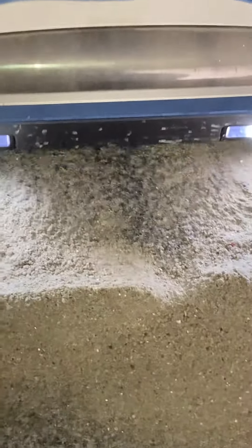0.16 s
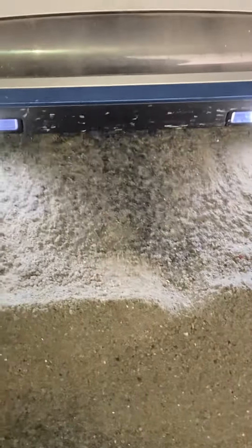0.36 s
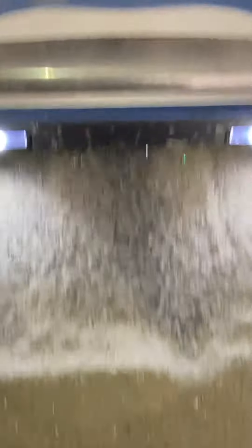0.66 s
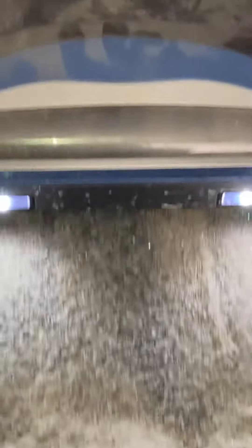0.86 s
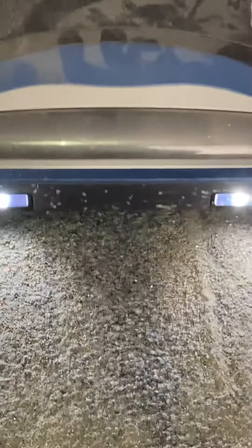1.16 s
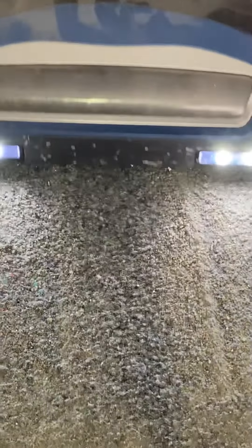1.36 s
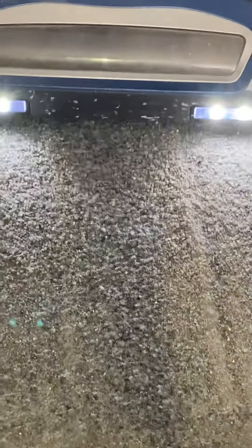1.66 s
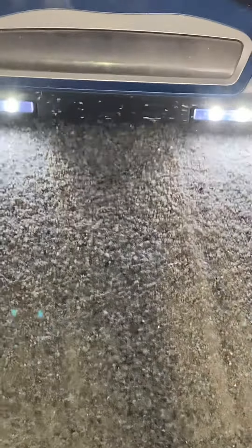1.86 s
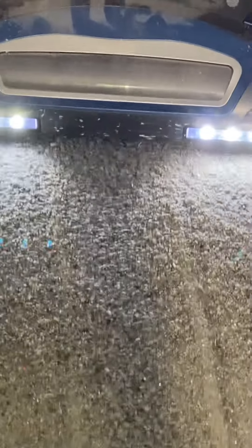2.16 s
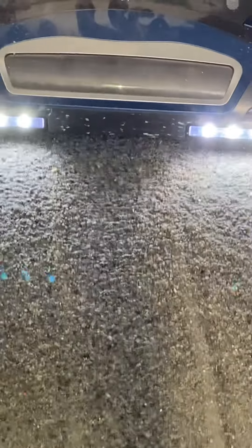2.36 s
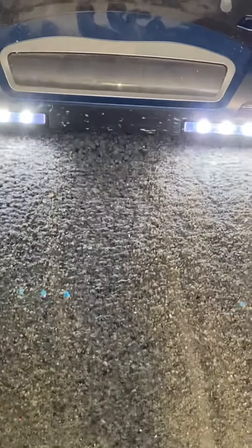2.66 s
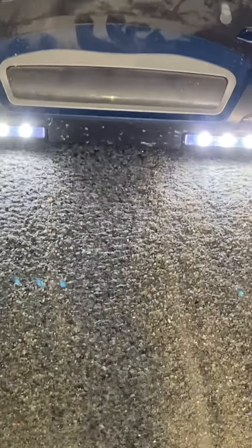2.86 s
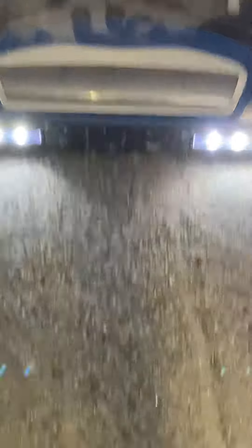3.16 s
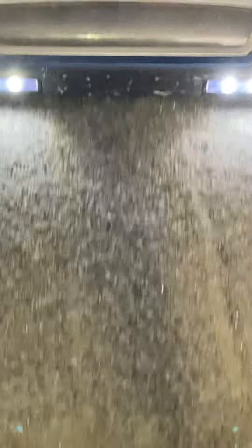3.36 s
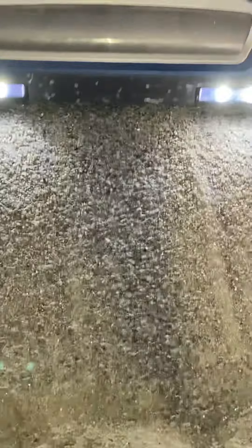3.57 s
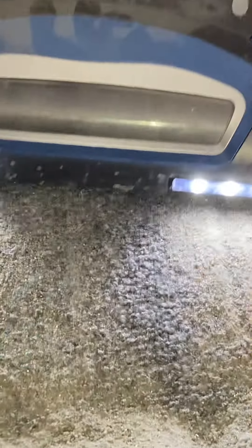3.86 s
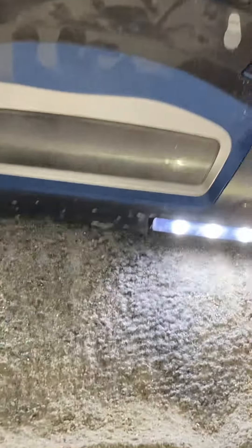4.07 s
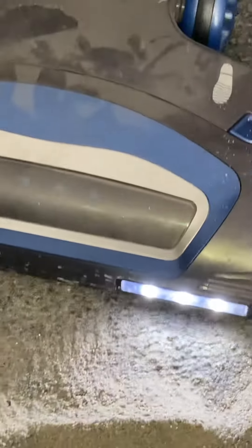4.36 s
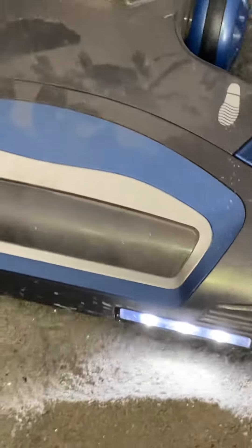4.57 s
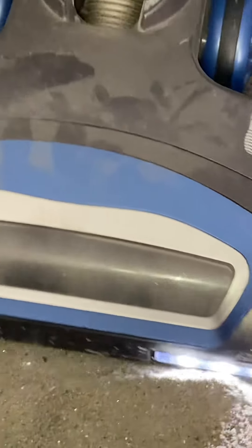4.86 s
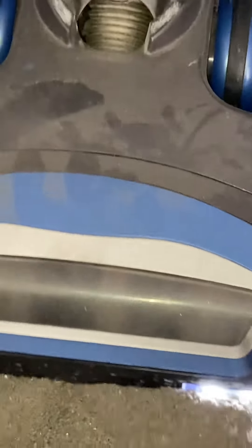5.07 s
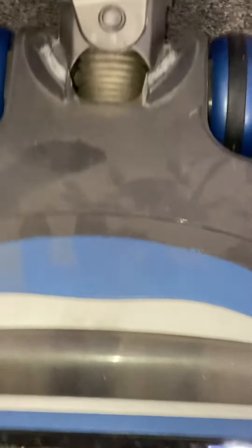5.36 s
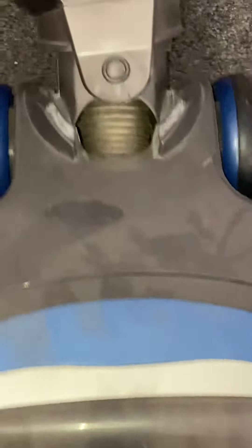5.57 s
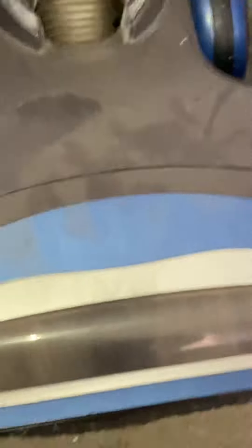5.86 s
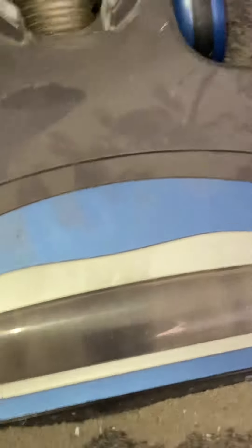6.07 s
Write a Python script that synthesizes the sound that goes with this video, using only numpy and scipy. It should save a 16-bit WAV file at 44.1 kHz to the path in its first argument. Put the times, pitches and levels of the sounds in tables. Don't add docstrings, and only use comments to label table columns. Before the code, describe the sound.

An upright vacuum cleaner runs steadily on carpet, hissing and roaring with a thin motor whine, grit ticks and a low brush drumming.

```python
import sys
import numpy as np
from scipy import signal
from scipy.fft import rfft, irfft, next_fast_len
from scipy.io import wavfile
from scipy.ndimage import uniform_filter1d

SR = 44100
rng = np.random.default_rng(int(sys.argv[2]) if len(sys.argv) > 2 else 0)


def convert_level_to_amplitude(level_db):
    exponent = np.asarray(level_db, float) / 20
    return 10 ** exponent


def dump_mix(stems):
    frames = np.atleast_2d(stems).T
    limited = np.clip(frames, -1, 1)
    pcm = np.round(limited * 32767).astype(np.int16)
    wavfile.write(sys.argv[1], SR, pcm)


N = 273420


def table(rows):
    s, *columns = np.transpose(rows)
    return [np.interp(np.arange(N) / SR, s, column) for column in columns]


def along(rows, hz, axis):
    rows = np.array(rows, float)
    return np.interp(np.log(hz + 1), np.log(rows[:, 0]), rows[:, axis])


def walk(rate):
    hold = int(SR / rate)
    steps = np.repeat(rng.standard_normal(N // hold + 1), hold)
    return 1.156 * uniform_filter1d(uniform_filter1d(steps, hold), hold)[:N]


def swells(rows, rest_db):
    t, total = np.arange(N) / SR, convert_level_to_amplitude(rest_db)
    for peak, rise, fall, db in rows:
        width = np.where(t < peak, rise, fall)
        total = total + convert_level_to_amplitude(db) * np.exp(-((t - peak) / width) ** 2)
    return 20 * np.log10(total)


def rush(colour, level_db, swell_db, flicker_db):
    size = next_fast_len(N)
    hz = np.fft.rfftfreq(size, 1 / SR)
    inside = (hz > colour[0][0]) & (hz < colour[-1][0])
    flow = rfft(rng.standard_normal((2, size))) * convert_level_to_amplitude(along(colour, hz, axis=1)) * inside
    place = 2 * np.log2((hz + 1) / colour[0][0])
    out, swell = 0, walk(9)
    for band in range(int(place[inside].max()) + 2):
        part = irfft(flow * np.clip(1 - abs(place - band), 0, 1), size)[:, :N]
        out = out + part * convert_level_to_amplitude(swell_db * swell + flicker_db * walk(14))
    return out / out.std() * convert_level_to_amplitude(level_db)


def tone(turns, level_db, wobble_db):
    return np.sqrt(2) * convert_level_to_amplitude(level_db + wobble_db * walk(10)) * np.sin(2 * np.pi * turns)


def ring(hits, hz, t60):
    pole = np.exp(2j * np.pi * hz / SR - np.log(1000) / (t60 * SR))
    return signal.lfilter([1], [1, -pole], hits).imag


# time in seconds, nozzle distance in metres, share of the housing under the phone 0-1.
HEAD = [(0.0, 0.39, 0.17), (.74, 0.29, 0.12), (1.24, .31, 0), (1.75, 0.43, 0), (2.23, 0.55, 0.06),
        (2.73, 0.76, 0.11), (3.2, 0.73, 0.35), (3.47, 0.58, .3), (3.75, .4, .35), (4.1, 0.42, 0.52),
        (4.7, .36, 0.59), (5.2, 0.38, 0.57), (5.7, 0.42, 0.9), (6.2, 0.4, 1)]


def head():
    metres, under = table(HEAD)
    return 20 * np.log10(metres / .3), under


def air_db(near_db, share, under_db):
    loss_db, under = head()
    return near_db - share * loss_db + under_db * under


# frequency in Hz, spectrum level in dB per Hz.
HISS = [(1800, -25), (2800, -4), (4000, -4), (5200, -5), (6000, -4), (6600, -2.3), (7800, -3), (8300, -.5),
        (8800, 0), (10500, -1), (12000, -.5), (13300, -2.5), (14000, -5), (15800, -7.5)]


def nozzle_hiss(seal):
    return rush(HISS, air_db(-22.78, share=.98, under_db=.1), swell_db=0, flicker_db=1.08) * seal


# frequency in Hz, spectrum level in dB per Hz.
ROAR = [(650, -11), (850, -7.5), (950, 0), (1050, -2), (1270, 2.5), (1500, -2), (1650, 0), (1800, -1),
        (2000, -21)]


def housing_roar(seal):
    return rush(ROAR, air_db(-34, share=.7, under_db=5.44), swell_db=.48, flicker_db=.5) * seal


# frequency in Hz, spectrum level in dB per Hz.
COVER = [(1650, -24), (1850, 2.5), (2000, 2.5), (2150, 1), (2450, 4), (2700, -4), (3100, -48)]


def cover_rush(seal):
    return rush(COVER, air_db(-33, share=1, under_db=-1.5), swell_db=.06, flicker_db=1.1) * seal


# frequency in Hz, spectrum level in dB per Hz.
DUCT = [(330, -41), (400, -14), (470, -11), (560, -3), (700, 1), (800, 1.5), (950, -4.5)]


def duct_rush():
    return rush(DUCT, air_db(-39.06, share=.19, under_db=5), swell_db=.3, flicker_db=.94)


# frequency in Hz, spectrum level in dB per Hz.
RUMBLE = [(25, -26), (45, -19), (80, -14), (125, -4), (170, -2), (210, 0), (270, -7), (305, -5),
          (335, -5.5), (380, -11.5), (450, -23)]


def carpet_rumble():
    return rush(RUMBLE, air_db(-38.8, share=.32, under_db=4.4), swell_db=.6, flicker_db=1.2)


# frequency in Hz, spectrum level in dB per Hz.
THROAT = [(330, -30), (380, -3), (450, 0), (540, -1), (620, -25)]


def throat_rush():
    return rush(THROAT, air_db(-47, share=.8, under_db=5), swell_db=.4, flicker_db=1.1)


# time in seconds, shaft speed in Hz.
MOTOR = [(0.0, 772.0), (1.7, 782.0), (5.0, 790.7), (6.2, 796.4)]
# peak, rise and fall in seconds, peak level in dB.
SHAFT = [
    (.1, .5, .4, -42),
    (1.0, 0.68, 0.23, -33.5),
    (1.55, 0.38, 0.18, -46),
    (3.45, 0.35, 0.24, -41.5),
    (4.12, 0.17, .1, -50),
    (4.85, .2, 0.51, -38),
    (6.1, .35, 0.44, -35),
]
# peak, rise and fall in seconds, peak level in dB.
BLADE = [
    (2.1, .4, .2, -51),
    (2.75, .35, .25, -48),
    (3.5, .35, 0.28, -47),
    (5.35, .2, .3, -46),
    (6.1, .4, .5, -48),
]


def motor():
    hz, shaft_db, blade_db = table(MOTOR)[0], swells(SHAFT, -46), swells(BLADE, -57)
    turns = np.cumsum(hz * (1 + 0.00052 * walk(6.02))) / SR
    unsteady_db = np.clip(-.3 * (shaft_db + 34.5), .6, 5)
    shaft = tone(turns, shaft_db - .4, unsteady_db) + tone(2 * turns, -55, wobble_db=3.5)
    return shaft + tone(7 * turns, blade_db - .1, wobble_db=4)


# time in seconds, turns in Hz.
ROLL = [(0.0, 57.27), (1.25, 57.4), (1.55, 54.46), (2.0, 54.4), (2.6, 52), (3.2, 53.6), (3.85, 52.9),
        (4.4, 49.78), (5.1, 52.24), (5.5, 52), (5.8, 50.5), (6.2, 50.2)]


def roll():
    return np.cumsum(table(ROLL)[0] * (1 + 0.00622 * walk(12))) / SR


# peak, rise and fall in seconds, peak level in dB.
ONCE = [
    (.5, 0.8, .7, -49),
    (1.62, 0.26, .2, -35),
    (2.0, 0.19, 0.46, -37),
    (2.8, 0.35, .3, -47),
    (3.25, 0.23, .15, -38),
    (3.65, 0.24, 0.23, -30.5),
    (4.4, .4, .35, -47),
    (5.3, .22, 0.3, -50),
    (6.0, .2, .3, -49),
]
# peak, rise and fall in seconds, peak level in dB.
ROWS = [
    (2.1, .1, 0.14, -42),
    (2.45, .12, 0.11, -40.5),
    (2.78, .1, 0.16, -46),
    (3.2, .12, 0.14, -42),
    (3.85, .1, 0.36, -26),
    (4.65, 0.28, 0.21, -38),
    (5.15, 0.13, 0.13, -40),
    (5.45, .12, .1, -43),
    (6.1, 0.31, .3, -40.5),
]
# peak, rise and fall in seconds, peak level in dB.
SIXTH = [
    (2.3, 0.22, 0.15, -45.5),
    (3.0, 0.32, .15, -45.5),
    (3.75, 0.23, 0.19, -42),
    (4.55, 0.33, .35, -43.5),
    (5.55, 0.27, 0.13, -36),
    (6.05, 0.21, .3, -37.5),
]
# time in seconds, level in dB.
DRONE = [(0, -47.5), (1.2, -51), (1.5, -59), (6.2, -67)]


def brush(turns):
    once_db, rows_db, sixth_db = swells(ONCE, -60), swells(ROWS, -54), swells(SIXTH, -53.5)
    hum = tone(turns, once_db - .5, wobble_db=.1) + tone(2 * turns, rows_db - 2, wobble_db=3)
    beat = tone(6 * turns, sixth_db - 2.5, wobble_db=2) + tone(5 * turns, -54, wobble_db=6.5)
    beat = beat + tone(4 * turns, .4 * sixth_db - 33, wobble_db=2.5)
    drone_hz = 101.6
    return hum + beat + tone(drone_hz * np.arange(N) / SR, table(DRONE)[0], wobble_db=1)


# time in seconds, peak in dB, low knock against the peak in dB.
GRIT = [(.406, -21, -12), (.894, -21, -12), (1.545, -22, -12), (2.084, -25, -12), (3.457, -23, -10),
        (3.730, -18, -10), (4.341, -23, -6), (4.749, -19, -12), (5.170, -17, -10), (5.696, -21, -4),
        (5.991, -17.5, 0)]
# delay in seconds, its spread in seconds, level in dB.
BOUNCES = [
    (.0008, 0, -1),
    (.002, .0006, -1),
    (.0045, .002, -6),
    (.008, .003, -8),
]
# frequency in Hz, level in dB, t60 in seconds.
DUCT_MODES = [
    (2520, 0, .016),
    (1900, -3, .01),
    (1350, -4, .01),
]


def grit():
    sharp, knock = np.zeros(N), np.zeros(N)
    for (s, db, low_db), bounce in zip(GRIT, rng.random(len(GRIT))):
        for delay, spread, loss_db in BOUNCES:
            at = int((s + delay + spread * bounce) * SR)
            sharp[at] = convert_level_to_amplitude(db + loss_db)
            knock[at] = convert_level_to_amplitude(db + low_db + loss_db + 1)
    grains = rng.random(N) < 40 / SR
    sand = grains * convert_level_to_amplitude(-38.5 + np.minimum(3 * rng.exponential(size=N), 9))
    wall = sum(convert_level_to_amplitude(db) * ring(sharp + sand, hz, t60) for hz, db, t60 in DUCT_MODES)
    wall = wall + ring(knock, hz=620, t60=.014)
    return signal.sosfilt(signal.butter(2, 300, "high", fs=SR, output="sos"), wall)


# frequency in Hz, spectrum level in dB per Hz.
GAP = [(1880, -41), (1970, 4), (2010, -5), (2050, -11), (2140, -35)]
# peak, rise and fall in seconds, peak level in dB.
WHISTLE = [
    (4.82, .12, .1, -39),
    (5.85, .15, .3, -51),
]


def gap_whistle():
    return rush(GAP, swells(WHISTLE, -62), swell_db=2, flicker_db=5)


# frequency in Hz, phase lead in radians, likeness 0-1, left minus right in dB.
PORTS = [(60, .03, 1, 3), (248, 0.11, 0.96, 4), (447, 0.88, 0.88, 3), (684, 1.23, 1, 5.5),
         (897, 2.34, 0.7, -2.4), (1060, 1.5, 0.39, -4.5), (1270, 0.66, 0.91, -1), (1710, 0.34, 0.46, -2),
         (2230, 0.94, 1, -0.5), (2740, 2.14, 0.46, -0.3), (3350, 3.1, 0.85, -4.5), (3660, 3.6, 0.66, 2.2),
         (4090, 4.61, 0.71, -1.5),
         (4800, 3.55, .8, 0), (5400, 3.14, .9, 0), (6100, 2.8, .85, 0), (6900, 1.6, .74, 0),
          (7650, .2, .95, 0), (9350, -.25, .945, 0), (10150, -1.6, .72, 0), (11050, -3.0, .985, 0),
          (12750, -3.45, .965, 0), (13200, -4.6, .7, 0), (13950, -5.85, .88, 0), (14600, -6.28, .96, 0),
          (16000, -6.28, .96, 0)]
# time in seconds, share of the later angle 0-1.
ANGLE = [
    (0, 0),
    (1.9, 0.2),
    (2.6, 0.29),
    (3.7, 0.94),
    (6.2, 0.99),
]


def ports(solid, flow, room_db):
    size = next_fast_len(N)
    hz = np.fft.rfftfreq(size, 1 / SR)
    pair = PORTS
    like = np.clip(along(pair, hz, axis=2), 0, 1)
    tilt = convert_level_to_amplitude(along(pair, hz, axis=3) / 2)
    slide = 0.098 * np.exp(-((hz - 3300) / 700) ** 2)
    early, late = (np.exp(1j * along(pair, hz * (1 + way * slide), axis=1)) / tilt for way in (-1, 1))
    solid, (shared, own) = rfft(solid, size), rfft(flow, size)
    direct = solid + like * shared
    parts = [(solid + shared) * tilt, direct * early, direct * late, np.sqrt(1 - like ** 2) * own / tilt]
    left, before, after, diffuse = irfft(np.array(parts), size)[:, :N]
    share = np.clip(table(ANGLE)[0], 0, 1)
    right = ((1 - share) * before + share * after) * convert_level_to_amplitude(-.3 * room_db) + diffuse * convert_level_to_amplitude(room_db)
    return np.array([left, right])


def scene():
    turns = roll()
    seal = 1 + 0.036 * np.sin(2 * np.pi * 2 * turns)
    flow = nozzle_hiss(seal) + housing_roar(seal) + cover_rush(seal)
    flow = flow + duct_rush() + carpet_rumble() + throat_rush() + gap_whistle()
    solid = motor() + brush(turns) + grit()
    room_db = .7 * head()[0] - 2 + 1.5 * walk(5.01)
    return ports(solid, flow, room_db)


def low_pass(x):
    return signal.sosfilt(signal.butter(12, 15910, fs=SR, output="sos"), x)


def record(dry):
    mix = signal.sosfilt(signal.butter(3, 40, "high", fs=SR, output="sos"), dry)
    return low_pass(mix)


dry = scene()
out = record(dry)
dump_mix(out)
```